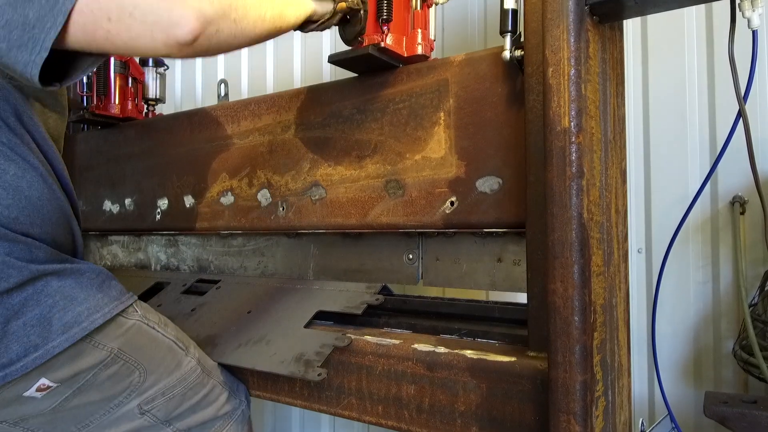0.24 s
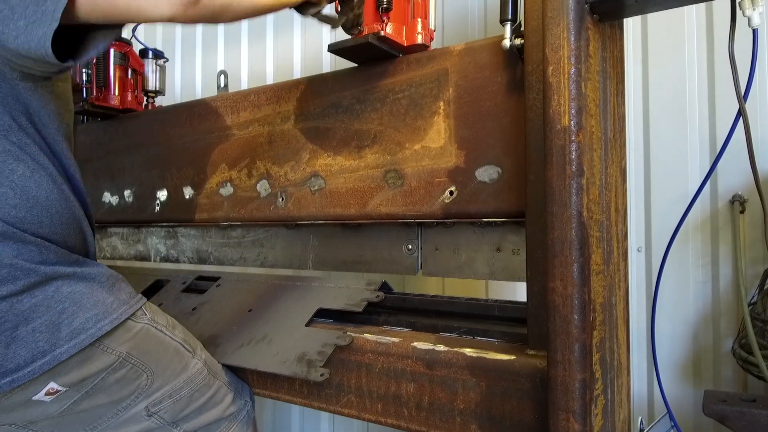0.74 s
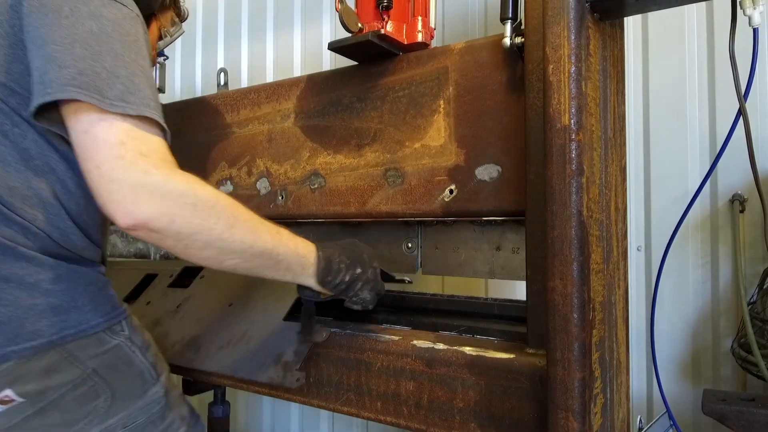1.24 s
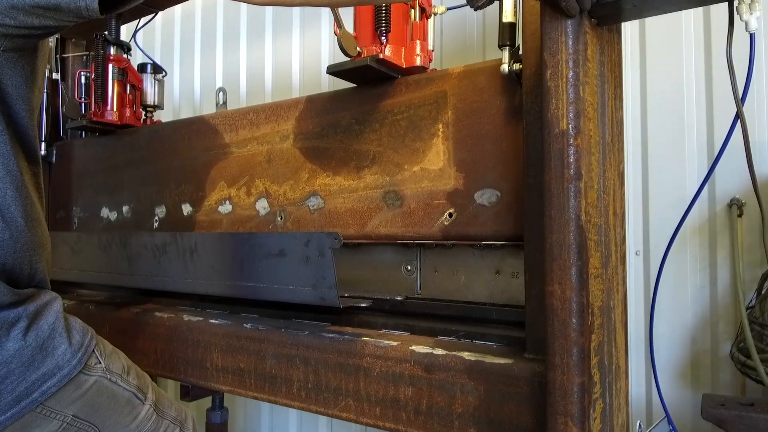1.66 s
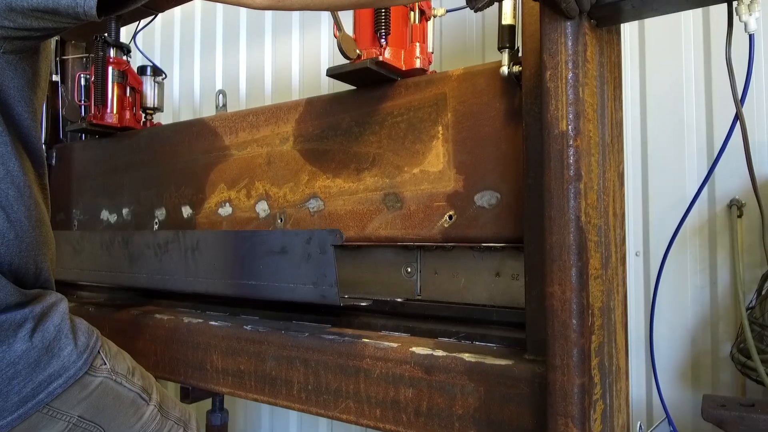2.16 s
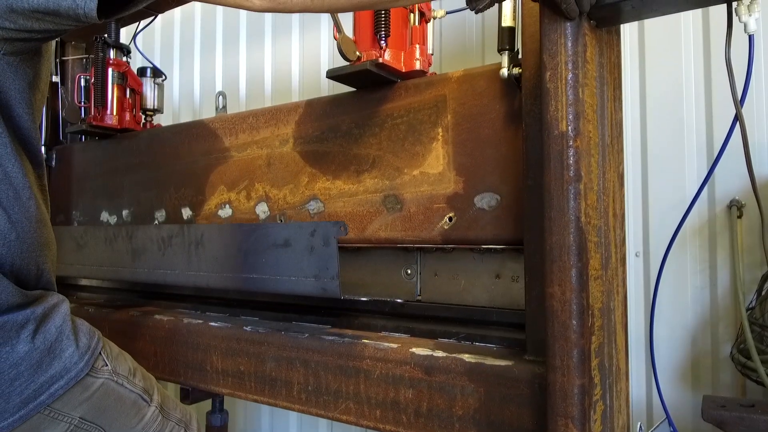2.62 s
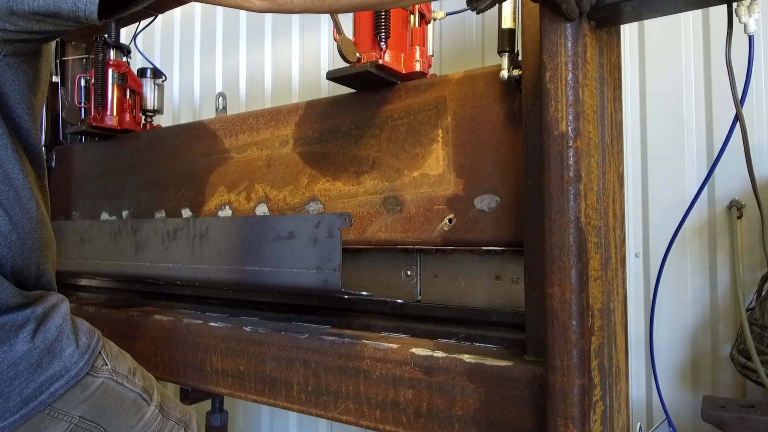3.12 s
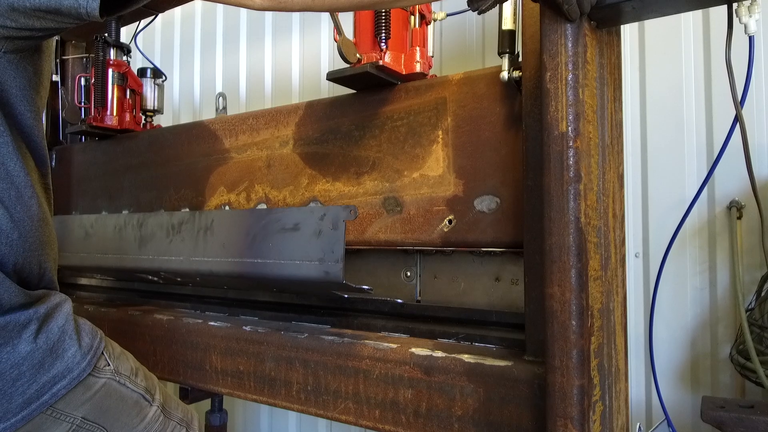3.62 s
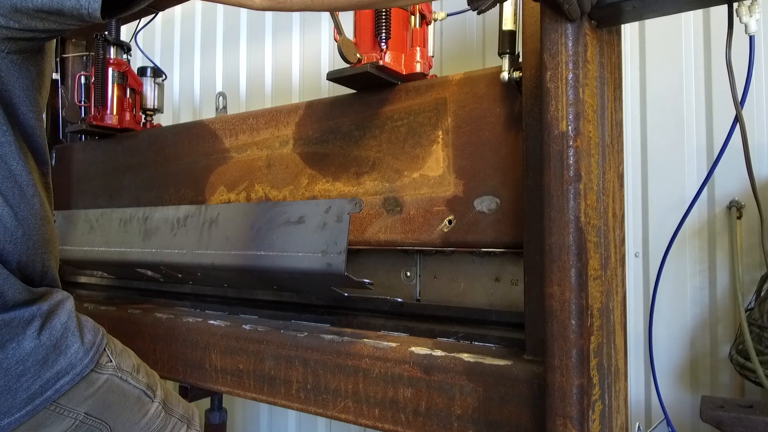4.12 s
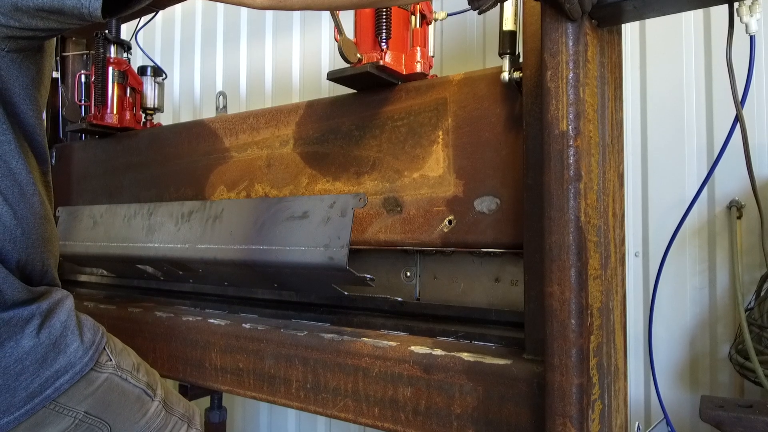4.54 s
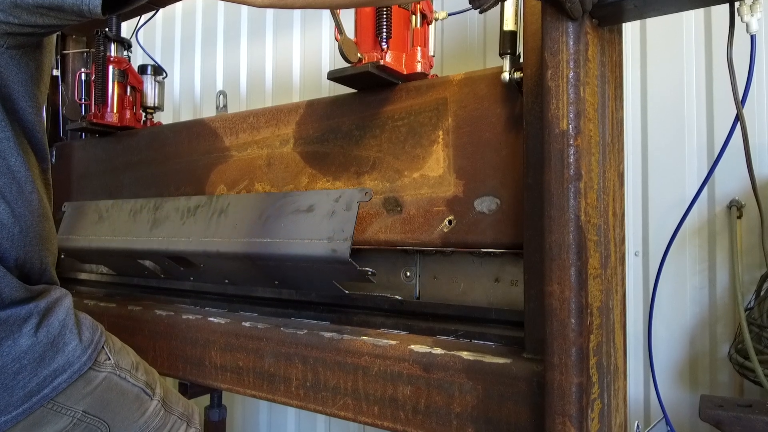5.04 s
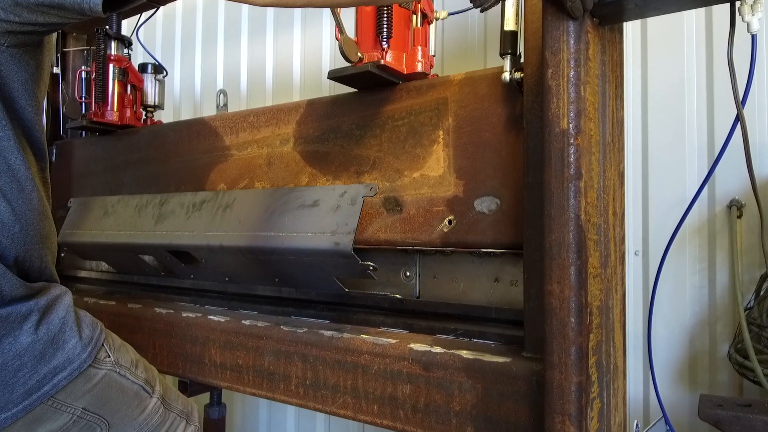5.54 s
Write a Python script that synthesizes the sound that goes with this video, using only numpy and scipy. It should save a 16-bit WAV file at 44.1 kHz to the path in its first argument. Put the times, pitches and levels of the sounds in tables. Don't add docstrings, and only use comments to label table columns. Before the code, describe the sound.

Near a homemade sheet-metal press, soft bumps and a small scrape come first, followed by a stronger metallic clank with gritty sliding. Then several pneumatic motors surge on together, venting rapid bursts of air, drifting in and out of step over a shaking, rattling heavy frame. Close mono microphone in a steel shed; the top end is slightly cut off.

```python
import sys
import numpy as np
from scipy import signal
from scipy.fft import rfft, irfft
from scipy.io import wavfile
from scipy.ndimage import uniform_filter1d

SR = 44100
rng = np.random.default_rng(int(sys.argv[2]) if len(sys.argv) > 2 else 0)


def makeup_ratio(level_db):
    decades = np.asarray(level_db, float) / 20
    return 10 ** decades


def pcm_store(signal):
    levels = np.round(np.clip(np.atleast_2d(signal), -1, 1) * 32767)
    wavfile.write(sys.argv[1], SR, levels.astype(np.int16).T)


N = 254898

# t/s, strokes until the next row/1, hiss level/dB
MOTOR_A = [(1.337, 11, -49.5), (1.793, 3, -48.5), (1.97, 0, -50.0), (2.117, 4, -46.0), (2.269, 11, -46.5),
           (2.783, 4, -54.0), (3.012, 5, -44.0), (3.226, 10, -47.0), (3.706, 3, -46.0), (3.872, 2, -44.5),
           (3.951, 2, -44.0), (4.067, 4, -45.5), (4.265, 2, -43.0), (4.355, 7, -50.0), (4.64, 8, -45.5),
           (5.044, 7, -47.5), (5.329, 10, -48.5), (5.824, 0, -50.0)]
MOTOR_B = [(1.361, 6, -49.5), (1.601, 6, -49.0), (1.897, 7, -47.0), (2.105, 12, -52.5), (2.54, 2, -44.5),
           (2.634, 7, -50.0), (2.886, 2, -43.0), (2.943, 5, -51.0), (3.175, 13, -50.0), (3.635, 6, -49.5),
           (3.916, 11, -51.5), (4.38, 7, -46.5), (4.617, 6, -53.0), (4.88, 0, -50.0), (5.4, 2, -43.0),
           (5.509, 0, -50.0), (5.576, 5, -44.5), (5.823, 0, -50.0)]
MOTOR_C = [(1.342, 9, -52.0), (1.78, 5, -47.0), (2.047, 3, -47.0), (2.262, 4, -49.0), (2.512, 4, -50.5),
           (2.821, 2, -43.0), (2.96, 1, -46.5), (2.998, 9, -49.0), (3.484, 2, -48.5), (3.571, 8, -49.0),
           (3.964, 4, -49.5), (4.244, 7, -49.5), (4.572, 3, -48.5), (4.804, 5, -47.5), (5.036, 2, -54.0),
           (5.177, 3, -43.5), (5.413, 7, -53.5), (5.786, 0, -50.0)]
MOTOR_D = [(1.37, 5, -51.0), (1.612, 4, -49.0), (1.873, 5, -46.5), (2.331, 6, -54.5), (2.68, 2, -44.0),
           (2.879, 6, -51.0), (3.364, 5, -52.0), (3.67, 2, -46.5), (3.827, 6, -53.0), (4.327, 5, -47.0),
           (4.615, 2, -48.0), (4.752, 6, -50.5), (5.038, 4, -46.5), (5.257, 4, -52.0), (5.437, 2, -45.0),
           (5.616, 3, -49.0), (5.785, 0, -50.0)]
# attack/s, steepness of the rise/1, top level/dB, hold/s, release/(dB/s), tail level/dB
HISS_PUFF = (.009, .38, 0.2, .002, 1100, -27)
ROAR_PUFF = (.0095, .6, 2.0, .002, 950, -13.5)
RATTLE_PUFF = (.006, .4, -1.5, .024, 400, -9)
# f/Hz, level/dB
JET_SPECTRUM = [(2310, -39.2), (3300, -19.2), (4000, -20.1), (5100, -23.4), (5700, -9.7), (6700, -10.3),
                (8600, -12.1), (10000, -10.3), (12200, -9.3), (14000, -9.2), (15250, -4.5), (15400, -26.0),
                (15750, -42.3), (16000, -62.3)]
# f/Hz, width/Hz, lift/dB
JET_RESONANCES = [(3680, 120, 2.0), (4410, 180, 3.9), (6070, 600, 7.6), (7080, 290, 3.6),
                  (7860, 500, 9.1), (9140, 380, 5.0), (11060, 1400, 9.0), (12910, 600, 4.5),
                  (14710, 600, 3.2)]
# f/Hz, level/dB
ROAR_SPECTRUM = [(320, -34), (550, 0), (668, -4), (788, -10.5), (923, -1.5), (1070, -0.5), (1310, -13),
                 (1540, -7), (2410, -2.5), (2880, -9.5), (3300, -20.5), (4290, -42), (7260, -120)]
# f/Hz, level/dB
FRAME_SPECTRUM = [(12, -19), (20, -4.5), (55, 2), (70, -1), (118, -5.5), (156, -6), (289, -10.5),
                  (353, -9.5), (425, -8), (570, -20.5), (665, -20), (800, -25), (1040, -30), (1760, -120)]
# f/Hz, level/dB, t60/s
FRAME_MODES = [(152.5, -9, 0.13), (247.4, -6, 0.096), (319.5, -9.5, 0.25), (362.4, -0.5, 0.1),
               (411.8, -1, 0.076), (487.6, -7, 0.089)]
# f/Hz, level/dB, t60/s
SHEET_MODES = [(119, 10, 0.067), (198, 3.5, 0.066), (256, 4, 0.13), (350, 4, 0.095), (430, -1.5, .1),
               (512, 1.5, 0.034), (607, -2, 0.088), (688, 1.5, 0.066), (792, -3.5, 0.077), (910, 1, 0.081),
               (1000, 0, 0.09), (1100, 3, 0.048), (1210, -2, 0.046), (1360, 0.5, 0.055), (1500, 0, .05),
               (1620, 3, 0.045), (1830, 2, 0.029), (1990, -0.5, .05), (2160, 3.5, 0.032), (2240, 0, 0.056),
               (2427, 1, 0.051), (2650, -9, 0.069), (2820, -2, 0.036)]
# t/s, peak level/dB, centre f/Hz, t60/s
BUMPS = [(.13, -68.5, 257, .22), (.21, -59.5, 328, .12), (.238, -66, 330, .3), (.282, -59.5, 370, .25),
         (.322, -61.5, 600, .2), (.376, -57.5, 400, .11), (.385, -64.5, 2100, .06), (.392, -53, 496, .12),
         (.46, -69, 350, .11), (.935, -69.5, 400, .58), (1.052, -55, 250, .12), (1.066, -47, 600, .08),
         (1.088, -48, 1100, .06), (1.108, -53.5, 320, .29), (1.175, -61, 182, .1), (1.158, -62, 1920, .35),
         (1.284, -63, 400, .18)]
# t/s, peak level/dB, centre f/Hz, t60/s
PINGS = [(0, -63.5, 430, .56), (0, -65.5, 220, .38), (.315, -68.5, 2650, .1), (.389, -55.5, 130, .09),
         (.778, -73, 1160, .14), (.78, -78, 2270, .2), (1.062, -46, 410, .13), (1.072, -42, 690, .08),
         (1.078, -49, 960, .14), (1.1, -59, 955, .31), (1.156, -55, 650, .1), (1.274, -53.5, 1100, .13)]
# t/s, peak level/dB, centre f/Hz, t60/s
SLIDES = [
    (.297, -56.5, 1640, .14),
    (.58, -73, 125, .4),
    (.93, -72, 1020, .9),
    (1.0, -68, 1020, .64),
    (1.052, -48, 605, .1),
    (1.056, -47.5, 2120, .17),
    (1.19, -61.5, 640, .6),
    (1.19, -62.5, 1000, .89),
    (1.2, -62, 300, .87),
    (1.262, -60, 2300, .17),
]
# t/s, peak level/dB, tilt of the top/dB, rise/s, t60/s
RASPS = [
    (.285, -82, 17, 0.0081, 0.17),
    (.306, -69.5, 12, .012, .11),
    (.388, -81, -6, 0.0074, 0.088),
    (1.056, -52, 0, 0.03, 0.095),
    (1.157, -61.5, 4, .003, 0.14),
    (1.2, -74, 3, 0.0088, 0.19),
    (1.265, -65, 1.5, 0.038, 0.21),
    (1.315, -64, -6, 0.02, 0.37),
]
# f/Hz, level/dB
RASP_SPECTRUM = [(2240, -34.1), (3200, -14.1), (4200, -9.8), (5100, -15.1), (5800, 1.1), (7500, -5.1),
                 (8600, -11.4), (10800, -6.0), (12600, -19.7), (14200, -15.6), (15200, -12.0),
                 (15700, -36.8), (16000, -56.8)]
# f/Hz, width/Hz, lift/dB
RASP_DIPS = [(9650, 600, -8.9), (13600, 450, -10.0)]
# f/Hz, level/dB
RUMBLE_SPECTRUM = [(12, -39), (20, -12), (85, -5.5), (129, -4.5), (156, -12), (281, -15), (375, -12),
                   (468, -19.5), (900, -29.5), (1170, -61), (1980, -120)]
# f/Hz, level/dB
LEAK_SPECTRUM = [(630, -31), (900, -11), (1500, -6), (2500, -10), (3000, -14), (3900, -21), (5500, -19),
                 (7000, -13), (9500, -14), (11000, -13), (12400, -17), (14500, -16), (15250, -22),
                 (15800, -45)]
# f/Hz, width/Hz, lift/dB
LEAK_PEAKS_AND_DIPS = [(1130, 400, 5.5), (2210, 400, 9.2), (4450, 570, 10.4), (4950, 60, -12.0),
                       (6040, 620, 9.2), (7860, 460, 4.1), (8860, 650, 6.4), (10100, 580, 12.0),
                       (13190, 710, 6.1), (15120, 560, 12.0), (5000, 220, -5), (4080, 150, -4), (3450, 150, -4)]

START_S, SURGE_S = 1.34, .2
STROKE_T = np.arange(0, .088, 1 / SR)


def air_motors():
    s, level_db = strokes()
    return exhaust_hiss(s, level_db) + exhaust_roar(s, level_db) + frame(s, level_db) + thump(s, level_db)


def strokes():
    rows = []
    for motor in (MOTOR_A, MOTOR_B, MOTOR_C, MOTOR_D):
        for (s, count, level_db), (until, *_) in zip(motor, motor[1:]):
            rows += [(s + k * (until - s) / count, level_db) for k in range(count)]
    s, level_db = np.transpose(rows)
    return s + .0004 * rng.standard_normal(len(s)), varied(level_db, 1.1)


def exhaust_hiss(s, level_db):
    running, _ = since_start()
    dull, thin = split(tilted(coloured(JET_SPECTRUM, JET_RESONANCES), .1 + .3 * running), 7000)
    shape_db = puff_db(*HISS_PUFF)
    hiss = envelope(s, level_db, shape_db) * thin * flutter(hz=247, depth_db=0.86)
    hiss += envelope(s, varied(level_db, 2.2), 0.8 * shape_db) * dull * flutter(hz=200, depth_db=1.06)
    return makeup_ratio(-0.1) * hiss


def exhaust_roar(s, level_db):
    running, surge = since_start()
    hollow, bright = split(coloured(ROAR_SPECTRUM), 1300)
    shape_db = puff_db(*ROAR_PUFF)
    roar = envelope(s, varied(level_db, 2.5), shape_db) * bright * flutter(hz=120, depth_db=0.93)
    hollow_envelope = envelope(s, varied(level_db, 3.2), 0.52 * shape_db)
    roar += makeup_ratio(-3.0) * hollow_envelope * hollow * flutter(hz=60, depth_db=0.3)
    return makeup_ratio(-8.8 - .3 * running + 4.8 * surge) * roar


def frame(s, level_db):
    running, surge = since_start()
    shake = envelope(s, varied(level_db, 1.93), puff_db(*RATTLE_PUFF))
    low, high = split(coloured(FRAME_SPECTRUM), 130)
    gust = makeup_ratio(-4.5) * envelope(s, varied(level_db, 2.4), puff_db(*ROAR_PUFF)) * low
    rattle = makeup_ratio(-3.5) * shake * high
    ringing = rms_one(body(shake * grit(per_s=410, spread_db=3), FRAME_MODES))
    ringing *= makeup_ratio(-10) * np.sqrt(np.mean(shake ** 2))
    return makeup_ratio(1.8 - .6 * running + 4.0 * surge) * (gust + rattle + ringing)


def thump(s, level_db):
    t = STROKE_T
    wave = -(t / .013) ** 2 * np.exp(2 - 2 * t / .013) * np.cos(2 * np.pi * 60 * (t - .012))
    pushes = train(s - .004, makeup_ratio(varied(level_db, 2)))
    return signal.fftconvolve(pushes, makeup_ratio(-3) * wave)[:N]


def since_start():
    running = np.maximum(np.arange(N) / SR - START_S, 0)
    return running, np.exp(-running / SURGE_S)


def puff_db(attack, steep, top_db, hold, db_per_s, tail_db):
    rise_db = steep * 20 * np.log10(np.clip(STROKE_T / attack, .01, 1))
    fall_db = top_db - db_per_s * np.maximum(STROKE_T - attack - hold, 0)
    return rise_db + np.maximum(fall_db, tail_db)


def envelope(s, level_db, shape_db):
    power = signal.fftconvolve(train(s, makeup_ratio(2 * level_db)), makeup_ratio(2 * shape_db))
    return np.sqrt(np.maximum(power[:N], 0))


def varied(level_db, spread_db):
    return level_db + spread_db * rng.standard_normal(len(level_db))


def sheet():
    return sheet_knocks() + sheet_rasps()


def sheet_knocks():
    out, contact = np.zeros(N), grit(per_s=2000, spread_db=4.5)
    kinds = ((BUMPS, .85, .0035), (PINGS, .22, .004), (SLIDES, .28, .02))   # rows, spread/octave, rise/s
    knocks = [(*row, spread, rise) for rows, spread, rise in kinds for row in rows]
    for k, (s, peak_db, centre_hz, t60, spread, rise) in enumerate(knocks):
        shape = swell(rise, t60)
        near = []
        for hz, level_db, mode_t60 in SHEET_MODES:
            distance = np.log2(hz / centre_hz) / spread
            near.append((hz, level_db - 6 * distance ** 2, mode_t60))
        sound = body(shape * contact[k * 6000:k * 6000 + len(shape)], near)
        peak = np.sqrt(uniform_filter1d(sound ** 2, size=441).max())
        add(out, makeup_ratio(peak_db) * sound / peak, s)
    return out


def sheet_rasps():
    out, rasp = np.zeros(N), coloured(RASP_SPECTRUM, RASP_DIPS)
    for s, peak_db, tilt_db, rise, t60 in RASPS:
        shape = swell(rise, t60)
        rubbing = tilted(rasp[int(s * SR):][:len(shape)], tilt_db)
        add(out, makeup_ratio(peak_db) * shape * rubbing, s)
    return out


def swell(rise, t60):
    t = np.arange(0, .6, 1 / SR)
    shape = (1 - np.exp(-t / rise)) ** 2 * makeup_ratio(-60 * t / t60)
    return shape / shape.max()


def shed():
    rumble = makeup_ratio(-74.5) * coloured(RUMBLE_SPECTRUM) * flutter(hz=20, depth_db=1.0)
    return rumble + makeup_ratio(-77) * coloured(LEAK_SPECTRUM, LEAK_PEAKS_AND_DIPS)


def rms_one(x):
    return x / np.sqrt(np.mean(x ** 2) + 1e-20)


def coloured(spectrum, lifts=()):
    hz = np.maximum(np.fft.rfftfreq(N, 1 / SR), 1)
    points = np.array(spectrum)
    level_db = np.interp(np.log(hz), np.log(points[:, 0]), points[:, 1], left=-90, right=-90)
    for centre_hz, width_hz, lift_db in lifts:
        level_db = level_db + lift_db / (1 + (2 * (hz - centre_hz) / width_hz) ** 2)
    return rms_one(irfft(rfft(rng.standard_normal(N)) * makeup_ratio(level_db), N))


def ring(clicks, hz, t60):
    r, w = makeup_ratio(-60 / (t60 * SR)), 2 * np.pi * hz / SR
    return signal.lfilter([0, np.sin(w)], [1, -2 * r * np.cos(w), r * r], clicks + 1e-18)


def body(drive, modes):
    out = 0
    for k, (hz, level_db, t60) in enumerate(modes):
        out = out + (-1) ** k * makeup_ratio(level_db) * ring(drive, hz, t60)
    return out


def grit(per_s, spread_db):
    sizes = makeup_ratio(spread_db * np.minimum(rng.exponential(1, N), 4)) * rng.choice([-1, 1], N)
    return rms_one(sizes * (rng.random(N) < per_s / SR))


def train(times, heights):
    out = np.zeros(N)
    np.add.at(out, np.minimum((times * SR).astype(int), N - 1), heights)
    return out


def flutter(hz, depth_db):
    low_pass = signal.butter(2, hz, fs=SR, output="sos")
    return makeup_ratio(depth_db * rms_one(signal.sosfilt(low_pass, rng.standard_normal(N))))


def split(x, hz):
    low = signal.sosfiltfilt(signal.butter(4, hz, fs=SR, output="sos"), x)
    return low, x - low


def tilted(x, tilt_db):
    low, top = split(x, 9500)
    return low + makeup_ratio(tilt_db) * top


def add(out, sound, s):
    at = int(s * SR)
    out[at:at + len(sound)] += sound


def scene():
    return (air_motors() + sheet() + shed())[None]


def top_cut(x):
    return signal.sosfilt(signal.butter(12, 16410, fs=SR, output="sos"), x)


def record(dry):
    low_pass = signal.ellip(6, .3, 30, 15380, fs=SR, output="sos")
    mix = signal.sosfilt(low_pass, dry)
    return top_cut(mix)


dry = scene()
out = record(dry)
pcm_store(out)
```